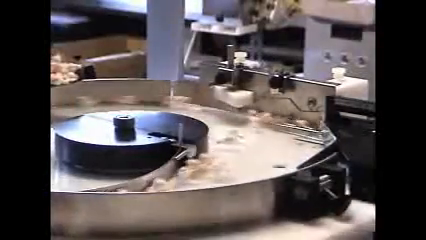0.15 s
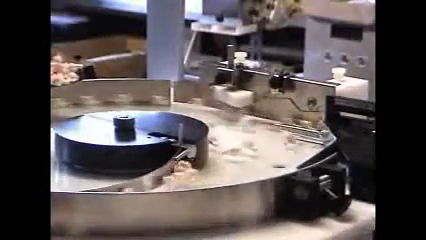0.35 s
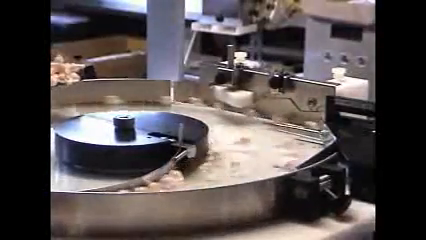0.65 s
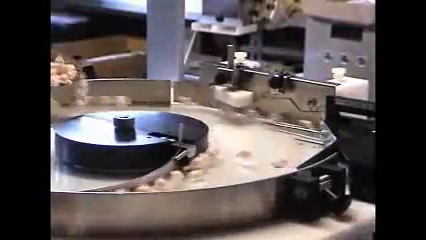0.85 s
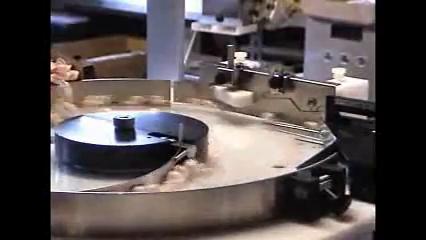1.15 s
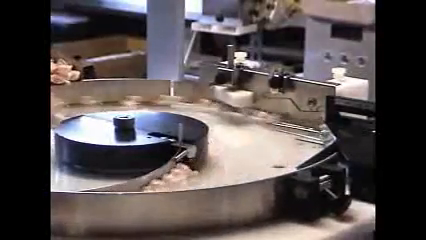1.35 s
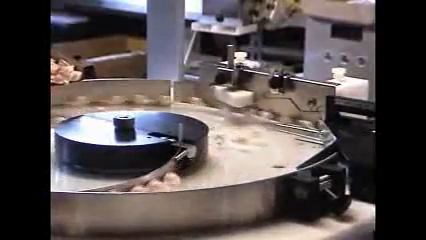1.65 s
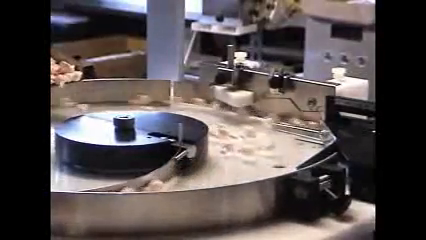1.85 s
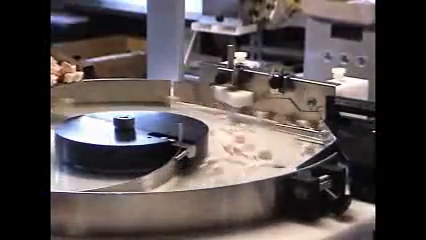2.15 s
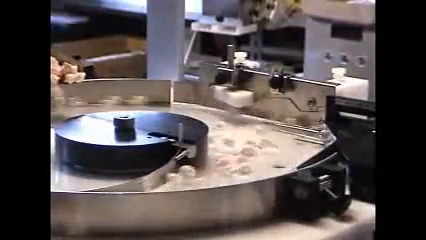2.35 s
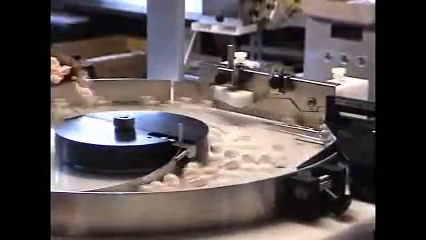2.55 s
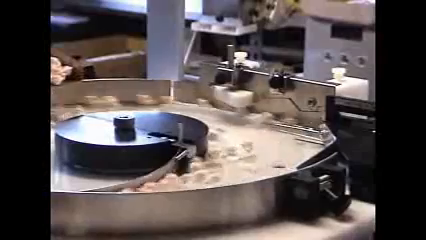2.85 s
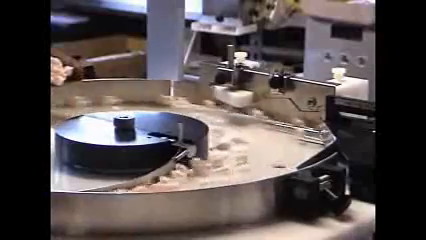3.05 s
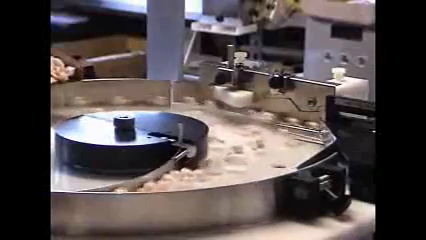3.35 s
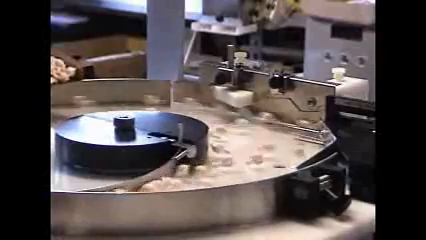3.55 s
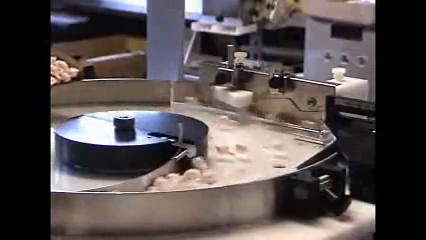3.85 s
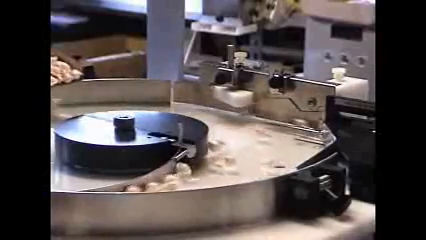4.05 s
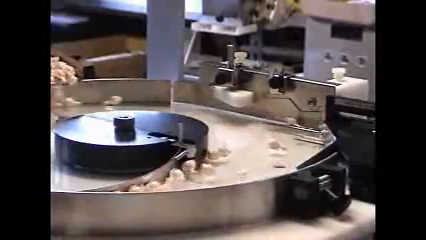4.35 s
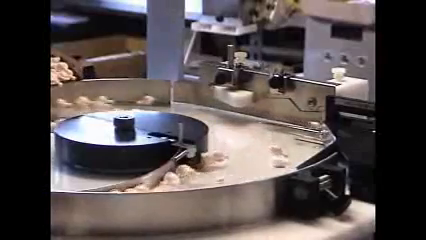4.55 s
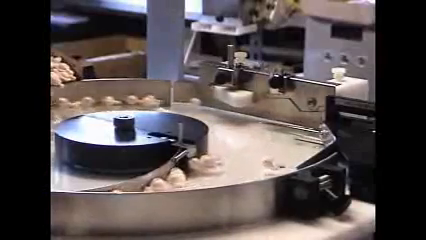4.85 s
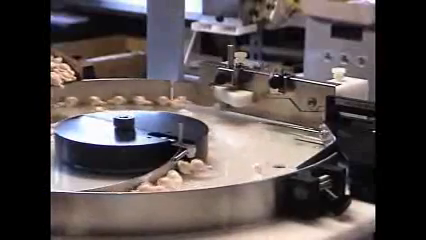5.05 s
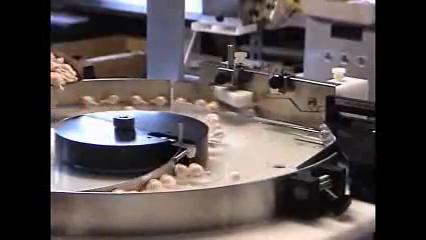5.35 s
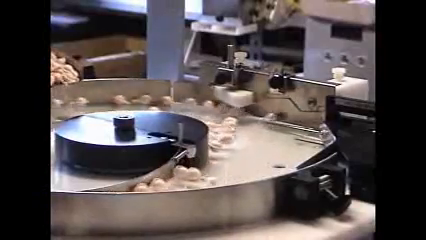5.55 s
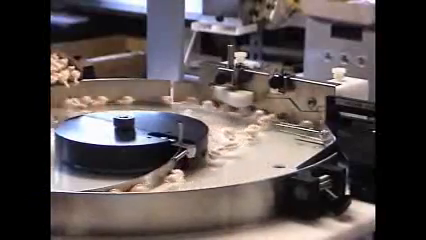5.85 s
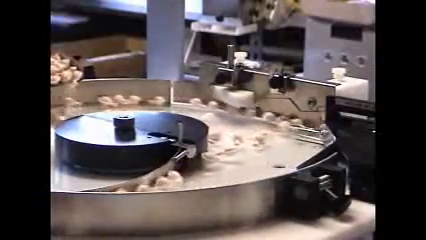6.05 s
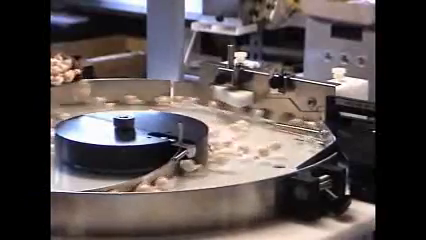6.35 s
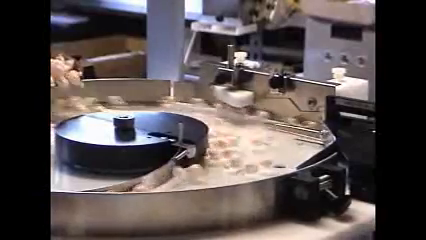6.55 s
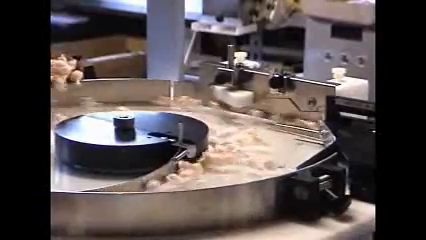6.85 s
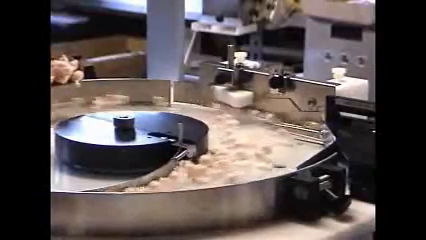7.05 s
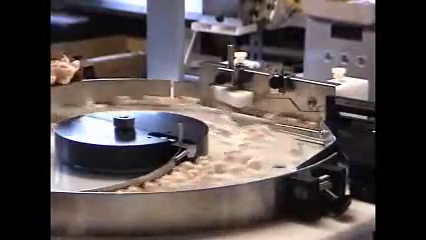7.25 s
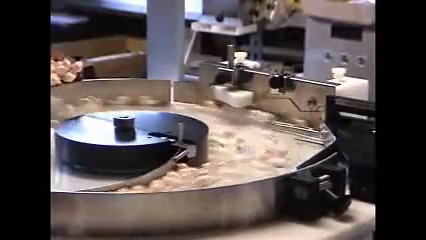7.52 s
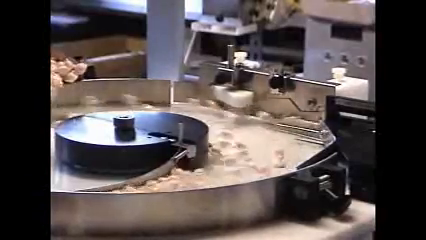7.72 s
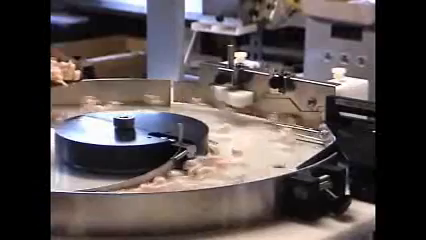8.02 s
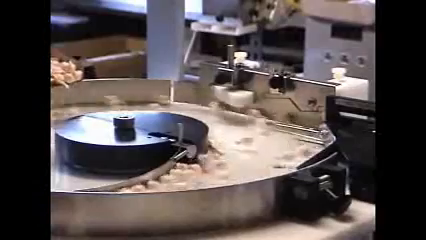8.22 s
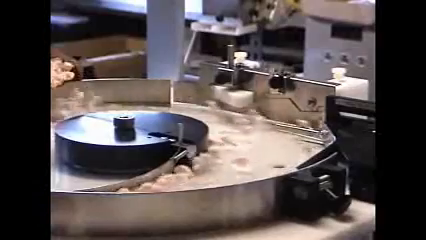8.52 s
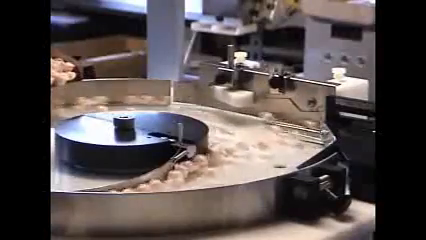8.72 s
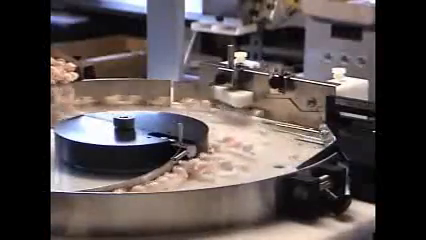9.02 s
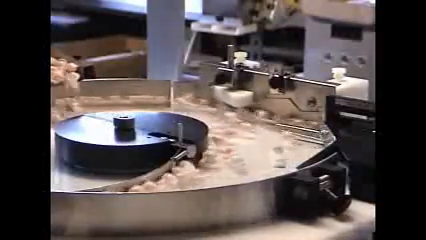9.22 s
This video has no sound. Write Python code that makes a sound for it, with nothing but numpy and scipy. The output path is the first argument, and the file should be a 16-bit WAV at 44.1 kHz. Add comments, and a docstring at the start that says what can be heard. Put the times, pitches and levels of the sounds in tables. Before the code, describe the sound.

A tabletop counting machine ticks and rattles with small hard pieces, breaks into a hollow rushing pour, nearly stops, then rattles steadily again.

```python
"""On a table top, a pill counter runs close to a small camera's microphone: nearly mono, little treble.
Hard pills on a spinning disc click on each other, the guides and the steel bowl: short pings and noise bursts.
Midway a batch rushes down the chute as clumped, resonant noise; the clatter almost pauses.
The feed then starts again with a low tumble of noise. Fan noise, unsteady drive lines and dull knocks lie under it.
"""
import sys
import numpy as np
from scipy import signal
from scipy.fft import rfft, irfft, next_fast_len
from scipy.io import wavfile
from scipy.ndimage import uniform_filter1d, minimum_filter1d, map_coordinates

SR = 44100
rng = np.random.default_rng(int(sys.argv[2]) if len(sys.argv) > 2 else 0)


def wrap_up_sound(samples):
    """Save the sound to the file named by the first command line argument, as 16-bit audio."""
    columns = np.atleast_2d(samples).T
    # keep every value between -1 and 1, then stretch to whole-number steps
    tamed = np.clip(columns, -1, 1)
    steps = np.round(tamed * 32767).astype(np.int16)
    wavfile.write(sys.argv[1], SR, steps)


N = 413658

EDGE_HZ, TOP_HZ = 4930, 15000  # the steep treble cut; the top of the faint fizz above it
# t/s: the batch enters the chute, has passed, and the feed starts again
POUR_S, POUR_END_S, RESTART_S = 3.53, 5.027, 5.705


def amp(db):
    """Decibels to gain."""
    return 10 ** (np.asarray(db) / 20)


def unit(x, axis=None):
    """Scale to rms 1."""
    return x / np.sqrt(np.mean(x ** 2, axis=axis, keepdims=True) + 1e-20)


def along(points, hz):
    """Interpolate (f/Hz, value) points on a log frequency axis."""
    f, v = np.transpose(points)
    return np.interp(np.log(hz + 1), np.log(f + 1), v)


def during(rows, fade=0.2):
    """One between the first and last row, with fades of the given seconds outside them."""
    start, stop = rows[0][0], rows[-1][0]
    return np.interp(np.arange(N) / SR, [start - fade, start, stop, stop + fade], [0, 1, 1, 0])


def wobble(rate):
    """A smooth random curve with rate knots a second."""
    knots = rng.standard_normal(int(N * rate / SR) + 4)
    return map_coordinates(knots, [np.arange(N) * rate / SR])


def filtered(x, response):
    """Filter x by a complex response of frequency."""
    n = x.shape[-1]
    m = next_fast_len(n + n // 4)
    return irfft(rfft(x, m) * response(np.fft.rfftfreq(m, 1 / SR)), m)[..., :n]


def body(modes, f):
    """Direct sound plus resonances of a solid part, each (f/Hz, width/Hz, level/dB)."""
    return 1 + sum(amp(db) * 1j * f * w / (c * c - f * f + 1j * f * w) for c, w, db in modes)


def place(times, sounds):
    """Sum one short sound per row at its time in seconds."""
    index = np.round(np.abs(times) * SR).astype(int)[:, None] + np.arange(sounds.shape[1])
    return np.bincount(index.ravel(), sounds.ravel(), N)[:N]


def fuzzy(phase, fuzz, rate):
    """A line of rms 1 whose strength and phase wander at random."""
    in_phase = (1 + fuzz * wobble(rate)) * np.sin(phase)
    return unit(in_phase + fuzz * wobble(rate) * np.cos(phase))


def tone(rows, rate):
    """A fuzzy line gliding through (t/s, f/Hz, level/dB) rows."""
    s, hz, db = np.transpose(rows)
    t = np.arange(N) / SR
    phase = 2 * np.pi * np.cumsum(np.interp(t, s, hz)) / SR
    line = fuzzy(phase, fuzz=.5, rate=rate)
    return during(rows) * amp(np.interp(t, s, db)) * line


def contacts(rate, spread_db, t60, size=512):
    """Tiny collisions, rate a second, each a decaying ping of its own pitch and size; rms 1."""
    count = int(rate * N / SR)
    when, pitch, force, phase = rng.random((count, 4)).T
    t = np.arange(size) / SR
    hz = 300 + pitch * (EDGE_HZ - 300)
    decay = amp(spread_db * force[:, None] ** 2 - 60 * t / t60)
    pings = np.sin(2 * np.pi * (hz[:, None] * t + phase[:, None])) * decay
    return unit(place(when * N / SR, pings))


def scraping(rate, spread_db, t60, size=1024):
    """Pills skid and bump on steel: noise of rms 1 in short overlapping bursts."""
    when, force = rng.random((int(rate * N / SR), 2)).T
    t = np.arange(size) / SR
    power = place(when * N / SR, amp(spread_db * force[:, None] ** 2 - 60 * t / t60) ** 2)
    return unit(np.sqrt(power) * rng.standard_normal(N))


def flow(start, stop, attack_s, db, sag_db_per_s, release_db_per_s):
    """Gain of a stream of pills: it sets in, sags as the supply runs down, and dies away faster after stop."""
    t = np.arange(N) / SR
    fall_db = sag_db_per_s * np.maximum(t - start, 0) + release_db_per_s * np.maximum(t - stop, 0)
    return np.clip((t - start) / attack_s, 0, 1) * amp(db - fall_db)


RUMBLE_DB, RUMBLE_HZ = -51.5, 110  # rms level and corner


def rumble():
    """The room's low rumble: lowpassed noise."""
    noise = rng.standard_normal(N)
    return amp(RUMBLE_DB) * unit(filtered(noise, lambda f: 1 / (1 + (f / RUMBLE_HZ) ** 4)))


def room(x, t60, size=8192):
    """Walls answer diffusely, as strong as the sound itself, with a new random tail for each block of x."""
    count = N // size + 1
    t = np.arange(size) / SR
    tails = rng.standard_normal((count, size)) * amp(-60 * t / t60) * (1 - np.exp(-t / 0.00076))
    tails = unit(tails, axis=1) / np.sqrt(size)
    blocks = np.pad(x, (0, count * size - N)).reshape(count, size)
    return place(np.arange(count) * size / SR, signal.fftconvolve(blocks, tails, axes=1))


# steady lines of the drive motor: (f/Hz, level/dB)
HUM = [(60, -53), (364, -40), (408, -45), (657, -49)]
# spectrum of the fan's air noise: (f/Hz, relative level/dB per Hz)
FAN = [(25, -23.5), (86, -17), (130, -12), (208, -11.5), (249, -6), (339, -6.5), (380, -6.5), (575, -7.5),
       (1050, -10), (4900, -25), (6370, -100)]
FAN_DB = -28.5  # rms level


def motor():
    """Fan turbulence as shaped noise, and drive lines that waver in strength and phase."""
    t = np.arange(N) / SR
    fan = unit(filtered(rng.standard_normal(N), lambda f: amp(along(FAN, f))))
    lines = sum(amp(db) * fuzzy(2 * np.pi * hz * t, fuzz=.45, rate=26) for hz, db in HUM)
    return amp(FAN_DB) * fan + lines


# a hollow hum that sinks after the feed restarts: (t/s, f/Hz, level/dB)
SINKING = [(4.6, 280, -39), (5.6, 295, -39), (6.4, 288, -35), (7.1, 258, -46), (7.42, 248, -33),
           (7.7, 245, -42), (8.4, 239, -45), (8.8, 236, -35), (9.38, 232, -39)]


def sinking_hum():
    """A hollow hum: one low fuzzy line that glides down."""
    return tone(SINKING, rate=34)


# a thin whine of the drive: (t/s, f/Hz, level/dB)
WHINE = [(1.45, 778, -46), (1.8, 778, -38.5), (3.0, 780, -40), (3.3, 778, -48), (5.6, 780, -44)]


def drive_whine():
    """The drive's whine: one fuzzy line of almost steady pitch."""
    return tone(WHINE, rate=49)


# dull knocks of the mechanism: (t/s, level/dB, 60 dB decay t/s, centre f/Hz)
KNOCKS = [(.776, -16.5, 0.12, 600), (.794, -10.5, 0.19, 480), (0.799, -21, 0.086, 130),
          (.875, -19.5, 0.17, 302), (.935, -17, 0.24, 790), (1.066, -15.5, .13, 760),
          (5.757, -11.5, 0.064, 900), (5.812, -17, .16, 620), (6.43, -9.5, 0.12, 1110),
          (6.438, -27, 0.47, 150)]
# resonances of the housing: (f/Hz, width/Hz, level/dB)
FRAME = [(132, 40, 16), (221, 34, 14), (394, 27, 13.7), (654, 40, 14.4), (805, 45, 17), (1004, 54, 12)]


def knocks(size=8192):
    """Soft blows of the mechanism: band-limited noise bursts boom in the housing."""
    s, db, t60, centre_hz = np.transpose(KNOCKS)[:, :, None]
    t = np.arange(size) / SR

    def colour(f):
        band = 1 / (1 + (1.4 * np.log((f + 1) / centre_hz)) ** 4) ** .5
        return body(FRAME, f) * band / (1 + (f / 1500) ** 4)

    thud = unit(filtered(rng.standard_normal((len(s), size)), colour), axis=1)
    return place(s[:, 0], thud * amp(db - 60 * t / t60) * (1 - np.exp(-t / 0.00057)))


# spectrum of pills tumbling in the feed: (f/Hz, relative level/dB per Hz)
FEED = [(40, -19), (200, -12.5), (330, -11.5), (480, -2.5), (850, -8.5), (1900, -9.5), (2800, -16)]


def tumble():
    """Pills drop into the hollow feed as it restarts: low-coloured bursts of noise."""
    grains = scraping(rate=600, spread_db=5, t60=.035)
    drop = flow(RESTART_S, stop=6.13, attack_s=0.021, db=-14.5, sag_db_per_s=18, release_db_per_s=48)
    return drop * unit(filtered(grains, lambda f: amp(along(FEED, f))))


# hollow note of the chute, which dips and rises as the batch passes: (t/s, f/Hz, level/dB)
HOOT = [(3.56, 610, -33), (3.8, 590, -34), (4.05, 545, -30), (4.22, 580, -30), (4.36, 645, -30),
        (4.6, 660, -30), (4.85, 662, -39)]


def chute_hoot():
    """The chute's hollow note: one very fuzzy line of gliding pitch."""
    return tone(HOOT, rate=170)


# clumps of pills that surge down the chute: (t/s, level/dB)
SURGES = [(3.43, -14), (3.49, -18.5), (3.536, -14), (3.572, -10), (3.66, -10), (3.725, -16), (3.785, -12.5),
          (3.91, -13), (3.954, -10.5), (3.98, -13), (4.06, -12.5), (4.133, -7), (4.195, -10.5),
          (4.265, -11.5), (4.305, -10), (4.345, -12), (4.419, -13), (4.485, -11.5), (4.592, -11),
          (4.67, -10), (4.782, -14.5), (4.84, -15), (4.925, -15.5), (5.036, -13)]


def surges(attack_s=0.0035, t60=0.38):
    """Gain of the clumps: each arrives all at once and trails off; their powers add."""
    t = np.arange(SR // 2) / SR
    s, db = np.transpose(SURGES)
    clumps = amp(db[:, None] - 60 * t / t60) * (1 - np.exp(-t / attack_s))
    return np.sqrt(place(s, clumps ** 2))


# spectrum of the pour before the walls colour it: (f/Hz, relative level/dB per Hz)
CHUTE = [(250, -31), (470, -21), (600, -3.5), (750, -6), (1100, -3.5), (1700, 1.5), (4900, 1)]
# resonances of the chute walls: (f/Hz, width/Hz, level/dB)
DUCT = [(659, 16, 2), (1690, 68, -11.5), (3280, 99, -8), (3550, 75, -4.5), (4140, 54, -6), (4550, 180, -3)]


def pour():
    """A batch rushes down in clumps over a thinning stream; its collisions ring the chute walls."""
    ticks = contacts(rate=3200, spread_db=9, t60=.014)
    grains = ticks + scraping(rate=1100, spread_db=7, t60=.018)
    colour = lambda f: amp(along(CHUTE, f)) * body(DUCT, f) * (f < EDGE_HZ)
    stream = unit(filtered(grains, colour))
    bulk = flow(POUR_S, POUR_END_S, attack_s=0.06, db=-15.0, sag_db_per_s=3.0, release_db_per_s=51.5)
    return np.hypot(bulk, surges()) * stream


# how busy the disc is, one list before and one after the pause: (t/s, relative level/dB)
JOSTLE = [
    [(0.0, -18), (0.7, -23), (0.94, -18.5), (1.32, -14.5), (1.82, -20), (2.14, -17.5), (2.39, -23),
     (2.81, -17.5), (3.2, -22), (3.4, -22)],
    [(5.78, -24), (5.9, -20.5), (6.25, -23), (7.06, -15), (7.28, -21), (7.73, -14.5), (8.03, -19.5),
     (8.64, -16.5), (9.05, -24), (9.38, -16.5)],
]
DRAIN_DB_PER_S = 38  # the crowd thins out once the batch has passed


def crowd_db(t):
    """How busy the disc is: it drains after the pour and refills when the feed restarts."""
    before, after = (np.interp(t, *np.transpose(rows)) for rows in JOSTLE)
    drained = before - DRAIN_DB_PER_S * np.maximum(t - POUR_END_S, 0)
    return np.where(t < RESTART_S, drained, after)


SETTLE_DB_PER_S, SETTLE_S = 29.5, .08  # rate and longest time of settling


def settling_db():
    """Each hard strike stirs the crowd, which then settles a little and holds."""
    t = np.arange(N) / SR
    hits = np.transpose(STRIKES)[0]
    since = t - hits[np.maximum(np.searchsorted(hits, t) - 1, 0)]
    return uniform_filter1d(-SETTLE_DB_PER_S * np.clip(since, 0, SETTLE_S), size=200)


# spectrum of the jostling pills before the bowl: (f/Hz, relative level/dB per Hz)
CROWD = [(150, -46.5), (500, -14), (1300, -4), (1700, -2), (2100, -4), (2500, 1), (3000, -3), (5000, -3)]


def jostle():
    """The crowd of pills ticks and skids as the disc carries it round: pings plus noise bursts."""
    ticks = contacts(rate=800, spread_db=9, t60=.014)
    grains = ticks + scraping(rate=300, spread_db=4.0, t60=0.024)
    crowd = unit(filtered(grains, lambda f: amp(along(CROWD, f)) * (f < EDGE_HZ)))
    return amp(crowd_db(np.arange(N) / SR) + settling_db() - 1.7) * crowd


LIGHT_PER_S, CLEAR_S = 10, .04  # pace before gaps; light strikes this near a hard one (s) are left out
# light strikes: peak setting over the crowd, scatter either way, rattle setting over the crowd
LIGHT_DB, LIGHT_SPREAD_DB, LIGHT_RATTLE_DB = 14, 2, 4.5
LIGHT_DETUNE = 0.066  # they land anywhere on a guide: pitch scatters by this share either way


def light_strikes():
    """Rows like STRIKES: pills meet the same guides at an uneven pace, harder on a busy disc."""
    count = int(LIGHT_PER_S * N / SR)
    slip, part, force, spot = rng.random((count, 4)).T
    hard_s, _, hard_hz, _, hard_bright = np.transpose(STRIKES)
    pick = (part * len(hard_hz)).astype(int)
    s = (np.arange(count) + slip) / LIGHT_PER_S
    db = crowd_db(s) + LIGHT_SPREAD_DB * (2 * force - 1)
    hz = hard_hz[pick] * (1 + LIGHT_DETUNE * (2 * spot - 1))
    rows = np.transpose([s, db + LIGHT_DB, hz, db + LIGHT_RATTLE_DB, hard_bright[pick]])
    return rows[np.abs(s[:, None] - hard_s).min(axis=1) > CLEAR_S]


CREST_DB = 14.5  # a blow's peak over its rms
# A blow this far over its rattle rings for the usual time;
# one that stands out more bounces clear and is shorter (exponent, dB per dB).
LONE_DB, LONE_SHORTENS = 13.5, .4
CRACK_T60_S = .03  # usual 60 dB decay
BOWL_SCATTER_DB = 4  # standard deviation of each bowl resonance from blow to blow
# hardest strikes of pills on the guides, before the bowl and mix gains:
# (t/s, peak level/dB, ring f/Hz, relative rattle level/dB, brightness/dB per octave)
STRIKES = [(0.006, -1, 2460, -13, 27), (0.092, 0, 2710, -8, 1.5), (0.16, 2, 3940, -11.5, 3.5),
           (0.195, -5.5, 2320, -11, 4), (0.234, 11, 1654, -10.5, 2.5), (0.288, -4.5, 2410, -14.5, 14.5),
           (0.324, -7.5, 1580, -12, 0), (0.358, 5.5, 1572, -5.5, 6.5), (0.427, -1, 3910, -16, 3.5),
           (0.458, -1.5, 3970, -23, 5), (0.490, 1, 2570, -24, -4), (0.535, -6, 3210, -20, 11),
           (0.564, 0, 1706, -17.5, 8), (0.65, -8.5, 1644, -12.5, 6.5), (0.669, -4, 2380, -23, -8.5),
           (0.751, 1, 1650, -13.5, 2.5), (0.774, -3.5, 1690, -6.5, 1), (0.8, 0.5, 3420, -9.5, -2.5),
           (0.866, -6.5, 3330, -12, -2), (0.907, -3.5, 2540, -11.5, -3.5), (0.926, 0, 1660, -5.5, 0),
           (0.97, 0.5, 2430, -22, -3.5), (1.02, -1, 1640, -13.5, -0.5), (1.044, 3.5, 2405, -6, 1),
           (1.065, 0.5, 1650, -19.5, -1), (1.106, 0, 2540, -8, 1.5), (1.166, -1, 2450, -9.5, 7),
           (1.226, 0.5, 2430, -14, -1), (1.242, -3.5, 3300, -13.5, -3.5), (1.341, -3, 2430, -7.5, 0),
           (1.378, -5, 3400, -9, -5.5), (1.413, 1.5, 2510, -7.5, -3), (1.447, -1.5, 2330, -7, -6.5),
           (1.495, 1.5, 1680, -8, -10), (1.587, 2.5, 1643, -18, -3.5), (1.619, 1, 2535, -8, 2.5),
           (1.672, 0.5, 1760, -13.5, 3.5), (1.761, -6, 3700, -8, -2.5), (1.91, 2.5, 2550, -9, -1),
           (1.993, -5.5, 2330, -15.5, 3.5), (2.016, -1, 4080, -20.5, 7.5), (2.046, -6.5, 3180, -7.5, -1.5),
           (2.126, -2.5, 2460, -13.5, 0.5), (2.148, -1.5, 3520, -9.5, -3.5), (2.202, 1.5, 2390, -9, 1),
           (2.257, 8, 2400, -25, -3.5), (2.283, -1.5, 3880, -15.5, -2), (2.388, -3, 2290, -16.5, 11),
           (2.44, -5, 4030, -19.5, -1), (2.488, -7, 3470, -16, 9), (2.521, 0.5, 4650, -9, 0),
           (2.59, -2.5, 3340, -15.5, -2.5), (2.608, -8, 1846, -11.5, -1.5), (2.651, 5, 2480, -23, 11),
           (2.69, -3, 4040, -8.5, -1), (2.754, 1.5, 1830, -8.5, 2.5), (2.791, 2.5, 2540, -7.5, 8),
           (2.813, -5, 2400, -10, -4.5), (2.851, -7, 2345, -10.5, 0.5), (2.885, -2, 2480, -14, 0.5),
           (2.934, -8, 1890, -9, 3), (2.995, 0.5, 2400, -10.5, -0.5), (3.067, 1.5, 3710, -11.5, -2),
           (3.14, -3.5, 3260, -12, 0.5), (3.179, -6, 4030, -15, 0.5), (3.377, 3, 3980, -13.5, 0.5),
           (3.451, -2, 3160, -2, -3.5), (3.623, 1.5, 3070, -4, 4.5), (5.061, 7, 4670, -7, 9),
           (5.247, -11, 2560, -18.5, -7), (5.31, -16, 2510, -19.5, 1), (5.756, -8, 1980, -11, -1.5),
           (5.905, -3.5, 1880, -19.5, 5.5), (5.937, -1.5, 1840, -16, -5), (6.082, -6.5, 4200, -20, -3.5),
           (6.128, -7.5, 1890, -17, -9), (6.288, -12.5, 1850, -9.5, -8), (6.322, -2.5, 2485, -7.5, 0),
           (6.397, 0, 2500, -5.5, -5.5), (6.429, 9, 2274, -5.5, 2.5), (6.483, 2, 2560, -20.5, 1),
           (6.517, -8, 2500, -16.5, -4), (6.573, -4, 1890, -16, -2), (6.641, 6.5, 2430, -21, 5),
           (6.686, -6.5, 1820, -20.5, 3), (6.719, -2, 2280, -21.5, 12), (6.779, 2.5, 2380, -19, 2),
           (6.815, 0, 2370, -11, 1), (6.827, -0.5, 2480, -2.5, 1.5), (6.884, 0, 2390, -5, 4.5),
           (6.923, 0, 2580, -10.5, 5), (6.961, 7, 2640, -5.5, 8), (7.003, -3.5, 1690, -3.5, 0.5),
           (7.07, 5.5, 2580, -16, 6), (7.085, 0, 2570, -15, -0.5), (7.153, 6, 2590, -0.5, 1),
           (7.217, -0.5, 2490, -13.5, -1), (7.268, 2, 2370, -10, 1), (7.312, 0, 2300, -20.5, 6.5),
           (7.379, -3.5, 2380, -16.5, 5.5), (7.456, 5, 2350, -13, -2), (7.492, 1.5, 2250, -11, 1.5),
           (7.529, -3.5, 2540, -4, -4.5), (7.61, 6.5, 2350, -19.5, 0), (7.64, -6.5, 2530, -14.5, -5),
           (7.672, 2.5, 2360, 2.5, -1), (7.722, -0.5, 2380, -17.5, 5.5), (7.771, 6.5, 2350, -12.5, 0.5),
           (7.813, 9, 2310, -13.5, 8), (7.857, -7.5, 2380, -7.5, -4), (7.897, -9.5, 2390, -9.5, 1),
           (7.961, 7, 2450, 0, 4.5), (8.085, -2, 2480, -10, 1.5), (8.123, 3.5, 2470, -12, 2.5),
           (8.164, 2, 2270, -17, 4), (8.224, 10.5, 2350, -11, 8), (8.276, 3.5, 2310, -11, 2.5),
           (8.343, -0.5, 2320, -13.5, 0), (8.363, -4, 2540, -6.5, -2), (8.417, -1.5, 1670, -11, -5.5),
           (8.458, -3.5, 2450, -24.5, 4.5), (8.494, -0.5, 4050, -20, 1.5), (8.55, -3, 2340, -14.5, 1),
           (8.599, -3.5, 2360, -8.5, -1.5), (8.673, -1, 1830, -9.5, 0.5), (8.744, -1.5, 2520, -4.5, -4.5),
           (8.829, -0.5, 3330, -13, -5), (8.875, -6, 3460, -20, 3.5), (8.914, -6.5, 2410, -14, 4),
           (8.96, -2, 2330, -12, 0.5), (8.986, 1, 1630, -16, -7.5), (9.075, -4, 4060, -21.5, 13.5),
           (9.099, -1, 4680, -25, 4.5), (9.135, 11.5, 3990, -11, 3.5), (9.189, 0, 2520, -8.5, -0.5),
           (9.209, -10, 3400, -10, -3), (9.279, -2.5, 2406, -8.5, -1), (9.329, 0.5, 3410, -11, -5.5)]
# modes of a struck pill on its guide: (f/Hz, relative level/dB, usual 60 dB decay t/s)
PILL = [(1660, -10, .018), (2380, -3, .024), (3950, 0, .017)]
# spectrum of the crack of a strike: (f/Hz, relative level/dB per Hz)
CLICK = [(150, -13.5), (500, -9), (1000, -3), (1700, 1.5), (2500, 2), (3000, 0), (4200, 1), (5000, 1)]
# resonances of the steel bowl: (f/Hz, width/Hz, level/dB)
BOWL = [(1087, 27, 1.5), (1673, 29, -8.5), (1859, 45, 2), (2507, 66, -8.5), (3390, 130, -4),
        (4230, 160, -6.5)]


def strikes(rattle_db=-4.5, rattle_t60=0.066, ring_t60=0.032, scatter=0.044, size=4096):
    """Each strike cracks, rings the pill and the part it meets, and sets its neighbours rattling."""
    s, db, ring_hz, after_db, bright = np.vstack([STRIKES, light_strikes()]).T[:, :, None]
    t = np.arange(size) / SR
    rise = 1 - np.exp(-(t / .0012) ** 2)
    age = t / np.clip(amp(LONE_SHORTENS * (after_db - db + LONE_DB)), .4, 1.3)

    def head(x):
        """Scale to rms 1 over the first 1/160 s."""
        return x / np.sqrt(np.mean(x[:, :SR // 160] ** 2, axis=1, keepdims=True))

    def tilt_db(f):
        """Each strike has its own brightness, from dull to sharp."""
        return bright * np.log2(np.clip(f, 1500, EDGE_HZ) / 2500)

    def colour(f):
        """The struck part colours the crack and the rebounds with its resonance."""
        click = amp(along(CLICK, f) + tilt_db(f)) * (f < EDGE_HZ)
        return click * body([(ring_hz, 170, 4)], f)

    def noise():
        """A fresh coloured noise for every strike."""
        return unit(filtered(rng.standard_normal((len(s), size)), colour), axis=1)

    crack = head(noise() * rise * amp(-60 * age / CRACK_T60_S))
    ring = head(np.sin(2 * np.pi * ring_hz * t) * rise * amp(-60 * age / ring_t60))
    pill = 0
    for hz, mode_db, life in PILL:
        detune, strength = rng.standard_normal((len(s), 2)).T[:, :, None]
        level = amp(mode_db + tilt_db(hz) + 2 * strength - 60 * age / life)
        pill = pill + level * np.cos(2 * np.pi * hz * (1 + scatter * detune) * t)
    blow = head(amp(-7) * crack + amp(2) * ring + head(pill * rise))

    # the rebounds come in lumps and stop short once the pills part
    lumps = unit(uniform_filter1d(rng.standard_normal((len(s), size)), size=200, axis=1), axis=1)
    rebounds = unit(noise() * amp(3.96 * lumps), axis=1)
    rattle_gain = amp(rattle_db + after_db - 60 * (t / rattle_t60) ** 2)
    rattle = rebounds * (1 - np.exp(-(t / 0.0029) ** 2)) * rattle_gain

    # each spot of impact wakes the bowl's resonances in its own proportions
    spots = BOWL_SCATTER_DB * rng.standard_normal((len(s), len(BOWL))).T[:, :, None]
    bowl = [(hz, width, mode_db + spot) for (hz, width, mode_db), spot in zip(BOWL, spots)]
    return place(s[:, 0], filtered(amp(db - CREST_DB) * blow + rattle, lambda f: body(bowl, f)))


# spectrum of the reflections that differ from left to right: (f/Hz, side level/dB)
WIDTH = [(60, -12), (300, -8.5), (1450, -14), (2160, -13), (3220, -5), (4800, -32)]


def scene():
    """Close pills ring the bowl over the machine; reflections and rumble give the little width there is."""
    ringing_crowd = filtered(jostle(), lambda f: body(BOWL, f))
    clatter = amp(-1.38) * (strikes() + ringing_crowd)
    machine = motor() + knocks() + sinking_hum() + drive_whine()
    near = clatter + pour() + chute_hoot() + tumble() + machine
    mid = near + amp(-10) * room(near, t60=0.13)
    side = filtered(room(near, t60=0.11), lambda f: amp(along(WIDTH, f))) + rumble()
    return np.array([mid + side, mid - side])


def sheen(x, grows=1.55):
    """A very faint treble fizz: noise that rises with the level above 3 kHz, most on its loudest moments."""
    bright = filtered(x, lambda f: f > 3000)
    loudness = np.sqrt(np.abs(uniform_filter1d(bright ** 2, size=400)))
    air = [(5000, 18), (6200, -0.5), (8300, 9.0), (14500, -3.5)]  # (f/Hz, relative level/dB per Hz)
    fizz = filtered(rng.standard_normal(N), lambda f: amp(along(air, f)) * (f > EDGE_HZ))
    return amp(-26.5) * loudness ** grows * unit(fizz)


CEILING_DB, RELEASE_DB_PER_S = -.5, 300  # limiter threshold and recovery


def record(dry):
    """The camera cuts treble steeply; its limiter catches the loudest strikes and ducks what follows."""
    narrow = filtered(dry, lambda f: 1 / np.sqrt(1 + (f / EDGE_HZ) ** 110))
    peak_db = 20 * np.log10(np.abs(narrow).max(axis=0) + 1e-9)
    over_db = np.maximum(peak_db - CEILING_DB, 0)
    recovery = RELEASE_DB_PER_S * np.arange(N) / SR
    gain = amp(recovery - np.maximum.accumulate(over_db + recovery))
    # the gain drops just ahead of a peak and is smoothed
    held = narrow * uniform_filter1d(minimum_filter1d(gain, size=50), size=44)
    return filtered(held + sheen(held[0]), lambda f: f < TOP_HZ)


dry = scene()
out = record(dry)
wrap_up_sound(out)
```